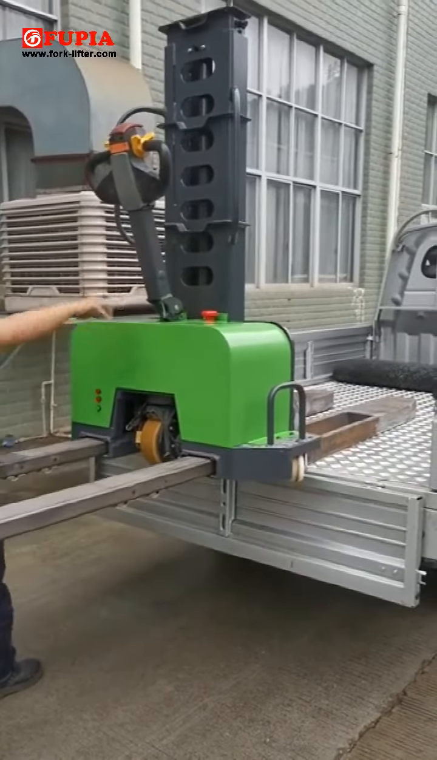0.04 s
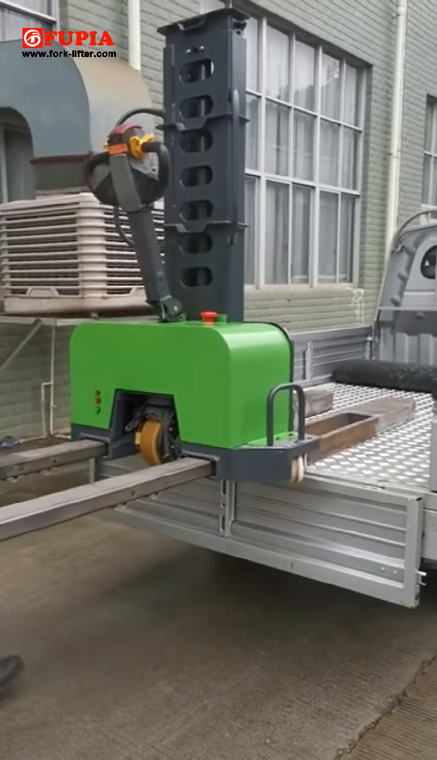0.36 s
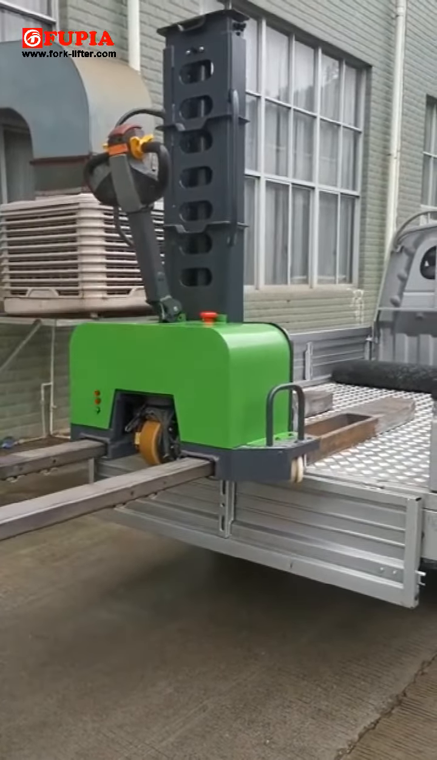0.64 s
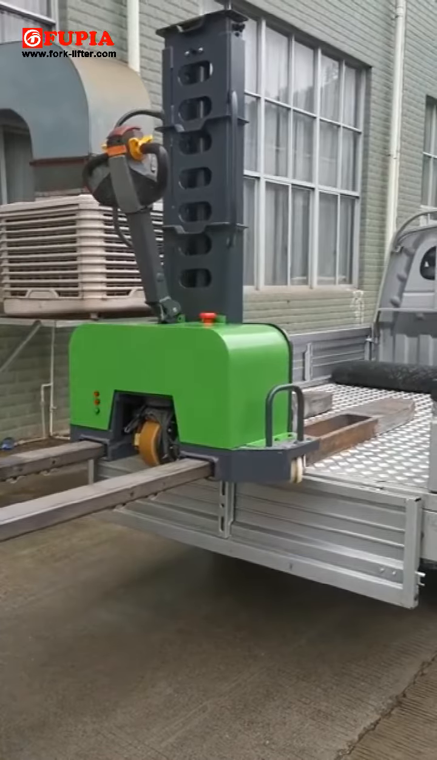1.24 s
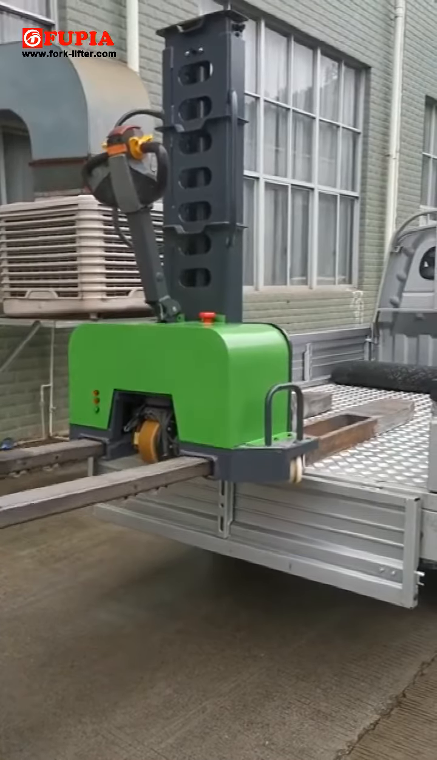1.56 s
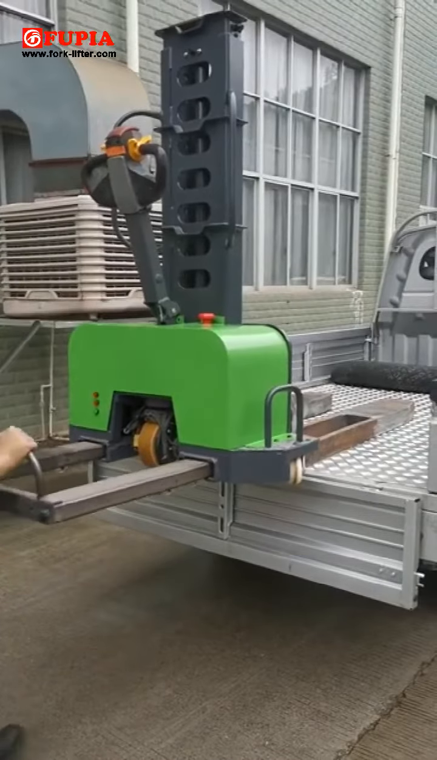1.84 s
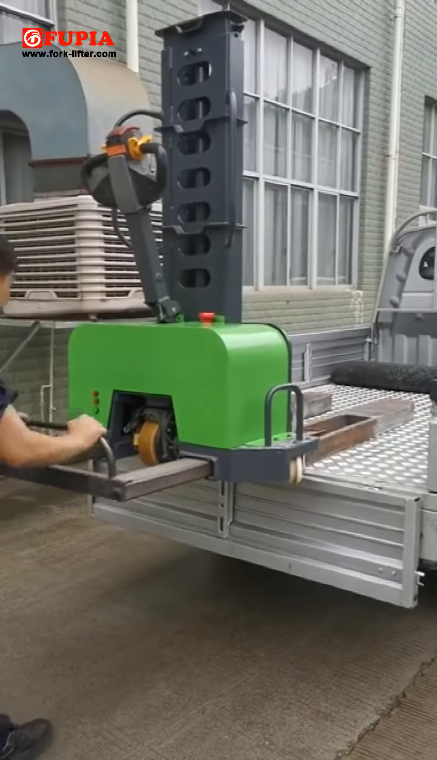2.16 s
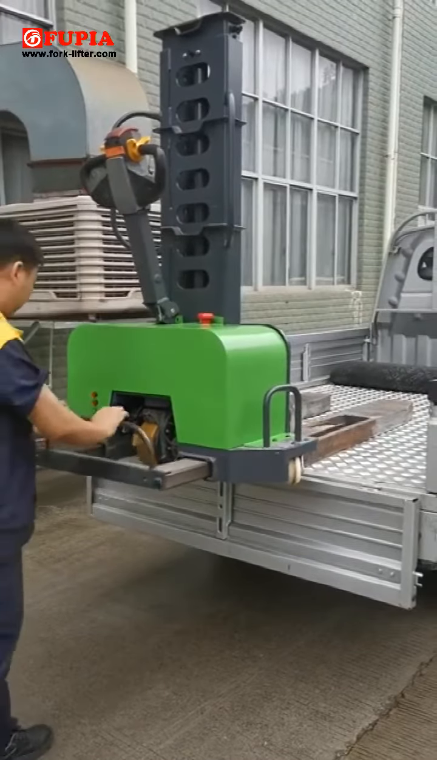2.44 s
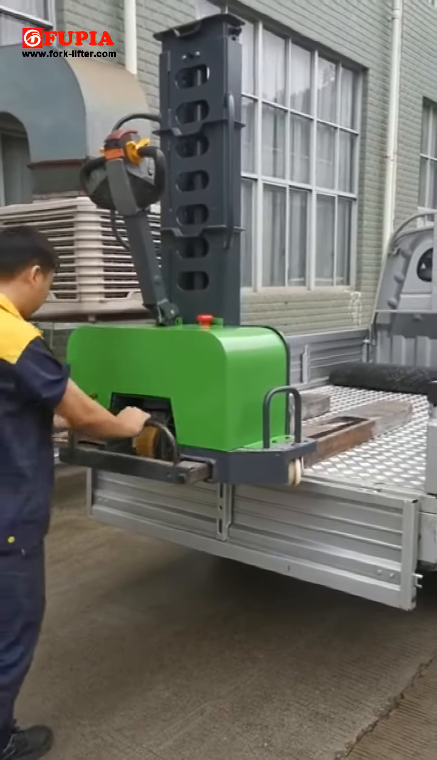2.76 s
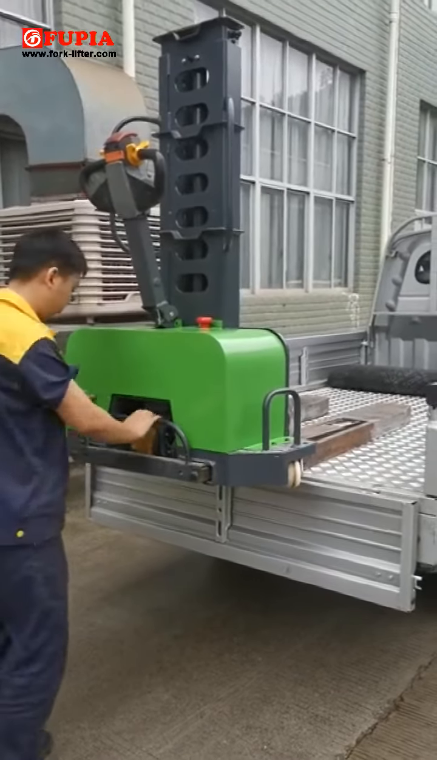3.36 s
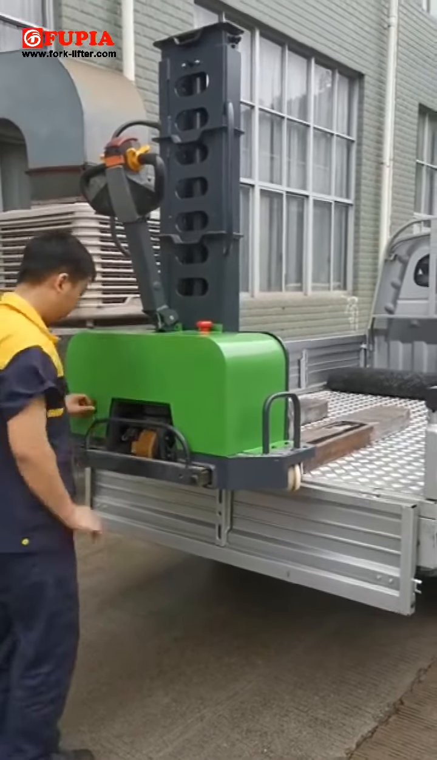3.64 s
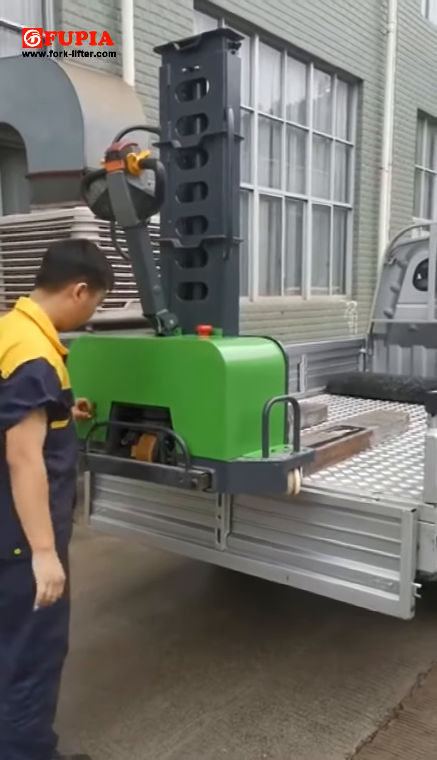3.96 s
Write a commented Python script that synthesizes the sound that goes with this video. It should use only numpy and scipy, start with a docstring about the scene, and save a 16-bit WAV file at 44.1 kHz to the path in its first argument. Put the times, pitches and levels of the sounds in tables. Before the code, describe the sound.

Steel scraping and rolling into a stacker, ending in a clunk, over distant machinery drone.

```python
"""A steel leg frame is pushed along its guides into a stacker on a truck bed in a yard.
Stick-slip friction excites the frame's modes as a scrape, the rollers growl and the hollow body booms.
Loose play makes the frame rattle in the guides; it strikes its stop with a clunk and rebounds,
each impact decaying as a sum of damped modes. The worker's sleeve rustles afterwards,
and distant machinery drones and whines steadily throughout."""
import sys
import numpy as np
from scipy import signal
from scipy.io import wavfile

SR = 44100
rng = np.random.default_rng(int(sys.argv[2]) if len(sys.argv) > 2 else 0)


def inscribe(sig):
    """Save sig as 16-bit PCM at rate SR to the path in sys.argv[1].

    A 1-D sig is mono; a 2-D sig holds one channel per row.
    Samples are clipped to [-1, 1] before scaling.
    """
    pcm = np.round(np.clip(np.atleast_2d(sig).T, -1, 1) * 32767)
    wavfile.write(sys.argv[1], SR, pcm.astype(np.int16))


N = 176400
TIME = np.arange(N) / SR

# spectrum of the distant machinery: (frequency [Hz], relative density [dB])
DRONE_SPECTRUM = [(13, -40), (22, -13.5), (74, -3.5), (102, -12.5), (143, -0.5), (212, -5), (239, 1.5),
                  (290, -3.5), (312, 0.5), (371, -9.5), (603, -13.5), (890, -13), (1190, -16),
                  (1350, -22.5), (1480, -20), (3650, -30.5), (7400, -44.5)]
# its likeness at the two ears: (frequency [Hz], correlation [1])
DRONE_CORRELATION = [(40, 1), (90, 1), (300, 0.97), (600, 0.78), (1100, 0.45), (1900, 0.35), (2400, 0),
                     (5000, 0)]
# its balance: (frequency [Hz], left minus right [dB])
DRONE_BALANCE = [(50, -0.5), (300, -1.8), (650, 1), (1100, -1.5), (2500, 0), (4800, 0), (6500, 3),
                 (7400, 18)]
# its wavering tones: (frequency [Hz], level [dB], wander rate [Hz])
HUM_TONES = [(106.8, -43, 6.6), (292.7, -46, 4.4), (891, -56, 4.5)]
# low rumbles in the yard: (time [s], half-length [s], level [dB], frequency [Hz])
RUMBLE_SWELLS = [(.06, 0.072, -32.5, 257), (.22, 0.13, -32.5, 146), (.39, 0.03, -32.5, 274),
                 (.52, 0.053, -30, 163), (.67, 0.054, -34, 108.3), (3.35, 0.024, -36.5, 268),
                 (3.62, 0.12, -37.5, 134)]
# rustle of the sleeve: (time [s], level [dB])
SLEEVE_ENVELOPE = [(3.68, -82), (3.75, -52.5), (3.88, -51.5), (4.0, -57)]

# likeness of the frame's sound at the two ears: (frequency [Hz], correlation [1])
STEEL_CORRELATION = [(300, 1), (450, 0.6), (700, 1.15), (1100, 0), (1500, -0.26), (2100, -0.36),
                     (3200, 0.7), (4400, 0.2), (7000, 0.36)]
# its balance: (frequency [Hz], left minus right [dB])
STEEL_BALANCE = [(500, -1.5), (850, -2), (1200, -5), (1650, -4), (2100, 0.5), (2800, -4.5), (4200, -1.5),
                 (4900, -2.5), (6000, 1.5), (7400, 9.5)]
# distinct modes of the frame: (frequency [Hz], level [dB], t60 [s])
STEEL_MODES = [(894, -16, .4), (1324, -11, .12), (1516, -15, .4), (1809, -13, .35), (1995, -11, .45),
               (2110, -11, .35), (2250, -9, .35), (2380, -7, .3), (2429, -7, .3), (2498, -10, .35),
               (2572, -5, .22), (2800, -7, .22), (2990, -7, .11), (3075, -12, .2), (3137, -1, .18),
               (3253, 1, .19), (3370, -9, .15), (3618, -11, .25), (3720, -10, .13), (3950, -5, .1),
               (4073, -6, .18), (4900, -10, .15), (5157, -16, .25), (6490, -13, .15)]
# its dense modes in a knock: (frequency [Hz], relative density [dB], t60 [s])
CLANG_SPECTRUM = [(150, -16, 0.33), (400, -13.5, 0.5), (910, -3, 0.19), (1500, -14, 0.3),
                  (1900, -8.5, 0.33), (2330, 0.5, 0.27), (2900, -3, 0.16), (3300, 4.5, 0.2),
                  (3630, -11, 0.22), (4000, 0, 0.18), (4230, -9.5, 0.07), (4690, -3, 0.35),
                  (5500, -10.5, 0.17), (7400, -9, 0.28)]
# modes of the hollow body: (frequency [Hz], level [dB], t60 [s])
HOLLOW_MODES = [(110, -30, 0.69), (161.3, -18.5, 0.37), (201.3, -28.5, 0.42), (253, -43, 0.068),
                (347, -33, 0.42), (450, -35, 0.28), (605, -35, 0.24)]
# booms of the body: (time [s], half-length [s], level [dB], frequency [Hz])
BOOM_SWELLS = [(1.61, 0.034, -29.5, 275), (1.76, 0.05, -31.5, 275), (1.77, 0.053, -37, 161),
               (2.01, 0.087, -31, 303), (2.02, 0.026, -28, 94.5), (2.26, 0.039, -32.5, 102),
               (2.27, 0.23, -34.5, 288), (2.43, 0.18, -35, 184.4), (2.82, 0.0091, -24.5, 130),
               (2.83, 0.029, -30.5, 236), (2.91, 0.029, -28, 301), (2.945, 0.026, -26.5, 242)]

# force at the rollers: (time [s], level [dB])
ROLL_ENVELOPE = [(1.52, -43), (1.57, -33), (1.68, -54), (1.73, -31.5), (1.82, -48), (1.9, -58), (2.0, -36),
                 (2.1, -41), (2.16, -40), (2.23, -49), (2.29, -41), (2.39, -36), (2.52, -48), (2.77, -46),
                 (2.815, -38.5), (2.92, -56)]
# spectrum of their growl: (frequency [Hz], relative density [dB])
ROLL_SPECTRUM = [(150, -38), (330, -13), (480, -13), (650, 7), (800, 3.5), (1000, 8), (1200, -0.5),
                 (1600, -11), (3000, -20)]
# hollow grinding: (time [s], half-length [s], level [dB], frequency [Hz])
GRIND_SWELLS = [(1.58, 0.022, -48, 1220), (1.79, 0.043, -38, 793), (1.82, 0.03, -30.5, 910),
                (2.04, 0.059, -37, 517), (2.105, 0.037, -30, 890), (2.22, 0.033, -32, 716)]
# thin rasp as the frame slows: (time [s], level [dB])
RASP_ENVELOPE = [(2.3, -50), (2.39, -47.5), (2.5, -41.5), (2.57, -53), (2.66, -44), (2.8, -48), (2.91, -58),
                 (2.94, -36)]
# its resonances: (frequency [Hz], bandwidth [Hz], level [dB])
RASP_RESONANCES = [(3945, 570, 1), (6870, 400, -8.5)]
# brief pitched grating of steel: (time [s], half-length [s], level [dB], frequency [Hz])
GRATE_SWELLS = [(1.645, .02, -42, 3300), (1.79, 0.033, -36, 2300), (2.07, 0.053, -39.5, 3330),
                (2.105, .02, -39.5, 2360), (2.29, 0.041, -42, 2380)]
# force of sliding friction: (time [s], level [dB])
SCRAPE_ENVELOPE = [(1.5, -66), (1.54, -35), (1.565, -32.5), (1.6, -37.5), (1.685, -40), (1.72, -34),
                   (1.78, -37), (1.87, -37), (1.97, -36), (2.07, -32.5), (2.17, -37.5), (2.21, -36.5),
                   (2.29, -41.5), (2.39, -41), (2.56, -51), (2.63, -46.5), (2.78, -45), (2.815, -43.5),
                   (2.92, -57.5), (2.96, -75)]
# spectrum of the scrape: (frequency [Hz], relative density [dB])
SCRAPE_SPECTRUM = [(300, -20.5), (550, -5), (900, 1), (1400, -7.5), (1750, 1), (2100, -5), (2450, -2),
                   (3000, -5.5), (3300, -4.5), (3700, -8.5), (4100, -4), (4900, -8), (5800, -11.5),
                   (7400, -15)]

# impacts on guides and stop: (time [s], level [dB], favoured frequency [Hz], boost there [dB])
FRAME_IMPACTS = [(1.555, -16.5, 2470, 9), (1.562, -12, 2600, 9), (1.572, -15.5, 2900, 7),
                 (1.63, -25, 3360, 9), (1.704, -18.5, 2450, 7.5), (1.723, -10.5, 4720, 8),
                 (2.003, -15.5, 2430, 4), (2.196, -15, 2460, 4.5), (2.221, -20, 5040, 15),
                 (2.375, -14, 3970, 7), (2.629, -25.5, 7000, 16), (2.802, -17.5, 4360, 9),
                 (2.934, -13, 3130, 6), (2.9362, -1.5, 3900, 6), (2.944, -9.5, 3130, 5),
                 (2.957, -14, 6130, 14.5), (2.9737, -11, 3360, 11), (2.982, -10.5, 3270, 6),
                 (3.016, -22, 2300, 11), (3.043, -24.5, 2060, 9)]
# blows of the stop on the body: (time [s], level [dB])
STOP_THUMPS = [(2.9345, -5.5), (2.949, -1)]


def from_db(db):
    """Amplitude grows tenfold for every 20 dB."""
    return 10 ** (np.asarray(db) / 20)


def rms_one(x):
    """Normalisation to unit mean power."""
    return x / np.sqrt(np.mean(x ** 2) + 1e-20)


def unit_energy(response):
    """A response of unit energy per ear preserves the power of white noise."""
    return response / np.sqrt(np.sum(response ** 2) / 2)


def pan(db):
    """Interaural level difference: left and right gains at constant power."""
    return rms_one(from_db([[db / 2], [-db / 2]]))


def right_first(pair, lead_s=0.000274):
    """Interaural time difference: the frame's sound reaches the right ear first."""
    t = TIME[:len(pair[0])]
    return np.array([np.interp(t - lead_s, t, pair[0], left=0), pair[1]])


def envelope(points):
    """Gain interpolated in decibels over time, silent outside the points."""
    return from_db(np.interp(TIME, *np.transpose(points), left=-120, right=-120))


def at_hz(points, hz, column=1):
    """Interpolation of a table column on a log-frequency axis."""
    table = np.array(points)
    return np.interp(np.log(hz), np.log(table[:, 0]), table[:, column])


def drift(rate_hz):
    """Low-passed noise wanders slowly, with unit rms."""
    hop, settle = 40, 2000  # audio samples per step; steps for the filter to settle
    pole = np.exp(-2 * np.pi * rate_hz * hop / SR)
    white = rng.standard_normal(N // hop + settle + 2)
    slow = signal.lfilter([1], [1, -2 * pole, pole * pole], white)[settle:]
    return np.interp(np.arange(N) / hop, np.arange(len(slow)), rms_one(slow))


def bandpass(x, low_hz, high_hz):
    """A band-pass filter acts as one broad resonance."""
    return signal.sosfilt(signal.butter(2, [low_hz, high_hz], "band", fs=SR, output="sos"), x)


def stereo_bands(spectrum, size, correlation=STEEL_CORRELATION, balance=STEEL_BALANCE):
    """Noise as (centre frequency, band) pairs; the mid-to-side ratio sets interaural correlation."""
    edges = np.r_[np.geomspace(20, 1600, 17)[:-1], np.geomspace(1600, 8000, 15)]
    white = rng.standard_normal((2, 2, size + 8000))
    for k, (low, high) in enumerate(zip(edges, edges[1:])):
        mid, side = bandpass(white[k % 2], low, high)[:, -size:]  # neighbours are independent
        hz = np.sqrt(low * high)
        alike = np.clip(at_hz(correlation, hz), -1, 1)
        mid, side = np.sqrt(1 + alike) * mid, np.sqrt(1 - alike) * side
        gains = from_db(at_hz(spectrum, hz)) * pan(at_hz(balance, hz))
        yield hz, gains * np.array([mid + side, mid - side])


def swells(rows, width):
    """Randomly driven resonances under Gaussian envelopes; width is the relative half-bandwidth."""
    out = np.zeros(N)
    for s, half_length, db, hz in rows:
        near = np.abs(TIME - s) < 4 * half_length
        bell = np.exp(-.5 * ((TIME[near] - s) / half_length) ** 2)
        shaken = bell * bandpass(rng.standard_normal(N)[near], hz / (1 + width), hz * (1 + width))
        out[near] += from_db(db) * shaken * np.sqrt(np.sum(bell ** 2) / np.sum(shaken ** 2))
    return out


def excite(force, response):
    """A linear body radiates the force convolved with its impulse response."""
    return signal.fftconvolve(force[None], response, axes=1)[:, :N]


def impulses(rows):
    """A brief blow acts as an impulse, one for each (time [s], level [dB]) row."""
    force = np.zeros(N)
    for s, db in rows:
        force[int(s * SR)] += from_db(db)
    return force


def yard(drone_db=-34, flicker_db=2.0):
    """Machinery drones as broadband noise and hums as randomly modulated tones; low rumbles swell."""
    bands = stereo_bands(DRONE_SPECTRUM, N, DRONE_CORRELATION, DRONE_BALANCE)
    drone = sum(band * from_db(flicker_db * drift(14.2)) for hz, band in bands)
    hum = np.zeros(N)
    for hz, db, rate_hz in HUM_TONES:
        phase = 2 * np.pi * hz * TIME
        hum += from_db(db) * (drift(rate_hz) * np.cos(phase) + drift(rate_hz) * np.sin(phase))
    rumble = swells(RUMBLE_SWELLS, width=0.14)
    return from_db(drone_db) * rms_one(drone) + pan(-1.4) * (hum + rumble)


def motor_whine(pitch_hz=1391.5, wander_hz=2, level_db=-54.5, flutter_db=3.1):
    """A distant motor holds one faint tone under slight frequency and amplitude modulation."""
    hz = pitch_hz + wander_hz * drift(5.4)
    amplitude = np.sqrt(2) * from_db(level_db + flutter_db * drift(13))
    return amplitude * np.sin(2 * np.pi * np.cumsum(hz) / SR)


def sleeve(low_hz=1800, high_hz=4800):
    """Cloth friction radiates band-limited noise as the worker's arm drops."""
    return envelope(SLEEVE_ENVELOPE) * rms_one(bandpass(rng.standard_normal((2, N)), low_hz, high_hz))


def mode_ring(modes, scatter_rad):
    """Modal superposition: damped sinusoids, each reaching the two ears with its own phase."""
    t = TIME[:SR // 2]
    ring = 0
    for hz, db, t60 in modes:
        phase = 2 * np.pi * hz * t + scatter_rad * rng.standard_normal((2, 1))
        ring = ring + from_db(db - 60 * t / t60) * np.sin(phase)
    return ring


def dense_ring(spectrum, t60_at, size=SR // 2):
    """Overlapping modes merge into noise that decays band by band."""
    bands = stereo_bands(spectrum, size)
    ring = sum(band * from_db(-60 * TIME[:size] / t60_at(hz)) for hz, band in bands)
    return unit_energy(right_first(ring))


def contacts(per_s=1100, spread_db=2.5, judder_db=1.5, judder_hz=38):
    """Asperities of rough steel collide at random; stick-slip modulates their strength."""
    sizes = from_db(spread_db * np.minimum(rng.exponential(1, N), 5)) * rng.choice([-1, 1], N)
    touching = rng.random(N) < per_s / SR
    return rms_one(sizes * touching * from_db(judder_db * drift(judder_hz)))


def moving_contact(force, spectrum, t60, places=14, size=4000, spread_db=1.7):
    """The response depends on the driving point: a moving contact fades between sets of resonances."""
    noise = 0
    for hz, band in stereo_bands(spectrum, places * size):
        place_gains = from_db(spread_db * rng.standard_normal(places))
        noise = noise + band * np.repeat(place_gains, size)
    start_s, end_s = SCRAPE_ENVELOPE[0][0], SCRAPE_ENVELOPE[-1][0]
    step = int((end_s - start_s) * SR / (places - 1))
    crossfade = np.sqrt(np.hanning(2 * step))
    decay = from_db(-60 * TIME[:size] / t60)
    out = np.zeros((2, N))
    for k, modes in enumerate(np.split(right_first(noise), places, axis=1)):
        i = int(start_s * SR) + (k - 1) * step
        sound = excite(force[i:i + 2 * step] * crossfade, unit_energy(modes * decay))
        out[:, i:i + sound.shape[1]] += sound
    return out


def body_booms():
    """The hollow body resonates in low swells as the frame moves."""
    return swells(BOOM_SWELLS, width=0.17)


def rollers(growl_db=1):
    """Rolling contact on rough steel drives a growl, with surges of hollow grinding."""
    force = contacts() * envelope(ROLL_ENVELOPE)
    growl = from_db(growl_db) * moving_contact(force, ROLL_SPECTRUM, t60=0.1)
    grind = swells(GRIND_SWELLS, width=0.19)
    return growl + right_first([grind, grind])


def rasp(catch_db=2.0, catch_hz=14):
    """Fine friction drives narrow resonances, catching in short uneven rubs."""
    out = 0
    for hz, width, db in RASP_RESONANCES:
        rubs = from_db(catch_db * drift(catch_hz))
        resonance = bandpass([contacts(), contacts()], hz - width / 2, hz + width / 2)
        out = out + from_db(db) * rms_one(rubs * resonance)
    return envelope(RASP_ENVELOPE) * out


def frame_scrape(ring, scrape_db=4, ring_db=-13.5):
    """Sliding friction forces the frame to vibrate: it scrapes, rings and grates."""
    friction = contacts() * envelope(SCRAPE_ENVELOPE)
    scrape = from_db(scrape_db) * moving_contact(friction, SCRAPE_SPECTRUM, t60=0.11)
    ringing = from_db(ring_db) * excite(friction, unit_energy(ring))
    grate = pan(-3) * np.array([swells(GRATE_SWELLS, width=0.05) for ear in range(2)])
    return scrape + ringing + grate


def rattle_force(per_s=30, above_friction_db=9.5, spread_db=2):
    """Loose play in the guides gives a Poisson train of knocks that scale with the friction."""
    sizes = from_db(above_friction_db + spread_db * rng.uniform(-0.9, 1, N))
    return (rng.random(N) < per_s / SR) * sizes * envelope(SCRAPE_ENVELOPE)


def impact_force(bandwidth_hz=400):
    """The point of impact decides which modes are driven hardest, so each blow favours one band."""
    force = np.zeros(N)
    for s, db, hz, boost_db in FRAME_IMPACTS:
        blow = impulses([(s, db)])
        favoured = signal.lfilter(*signal.iirpeak(hz, hz / bandwidth_hz, fs=SR), blow + 1e-18)
        force += blow + (from_db(boost_db) - 1) * favoured
    return force


def frame_knocks(ring, clang_db=5.5, crack_db=-8.5, crack_decay_s=0.004, ring_db=-28):
    """Free vibration after impact: the frame cracks, clangs and rings; the stop thumps the body."""
    clang = from_db(clang_db) * dense_ring(CLANG_SPECTRUM, lambda hz: at_hz(CLANG_SPECTRUM, hz, 2))
    crack = from_db(crack_db) * dense_ring(CLANG_SPECTRUM, lambda hz: crack_decay_s * np.log(1000))
    steel = pan(-3) * (clang + crack) + from_db(ring_db) * ring
    knocks = excite(impact_force() + rattle_force(), steel)
    thump = excite(impulses(STOP_THUMPS), mode_ring(HOLLOW_MODES, scatter_rad=0.094))
    return knocks + thump


def scene():
    """The sources superpose; friction and impacts excite the same modes of the frame."""
    ring = pan(-4) * mode_ring(STEEL_MODES, scatter_rad=0.55)
    background = yard() + motor_whine() + sleeve()
    sliding = body_booms() + rollers() + rasp() + frame_scrape(ring)
    return background + sliding + frame_knocks(ring)


def record(dry, cutoff_hz=7520):
    """An elliptic low-pass filter cuts the treble steeply."""
    return signal.sosfilt(signal.ellip(12, .2, 90, cutoff_hz, fs=SR, output="sos"), dry)


dry = scene()
out = record(dry)
inscribe(out)
```